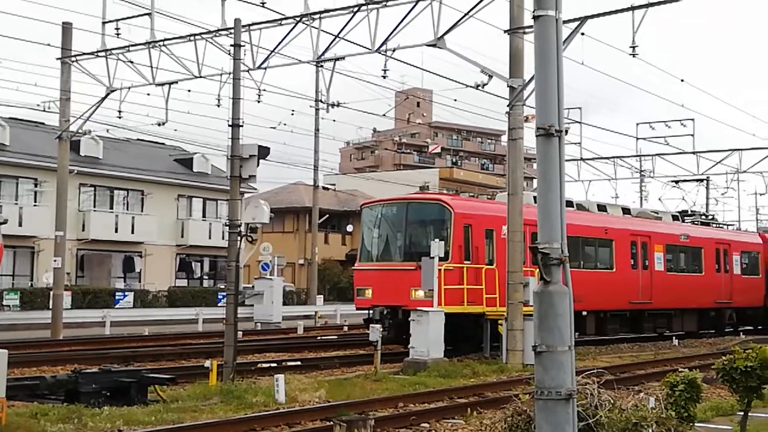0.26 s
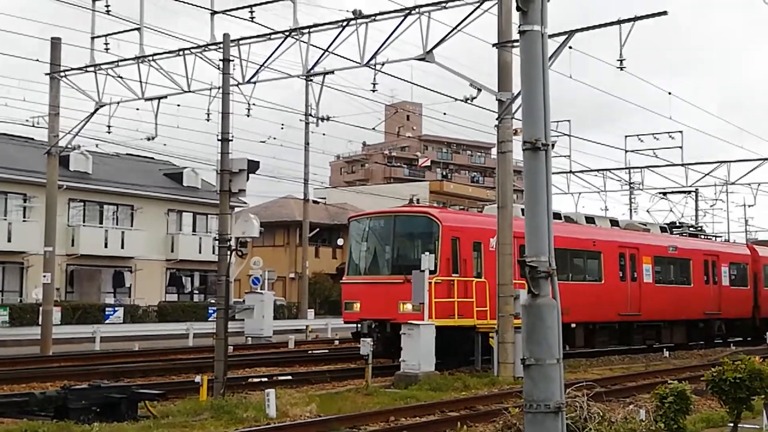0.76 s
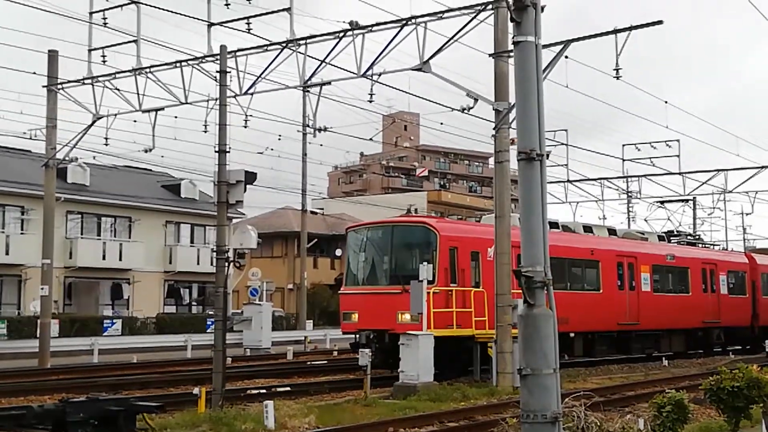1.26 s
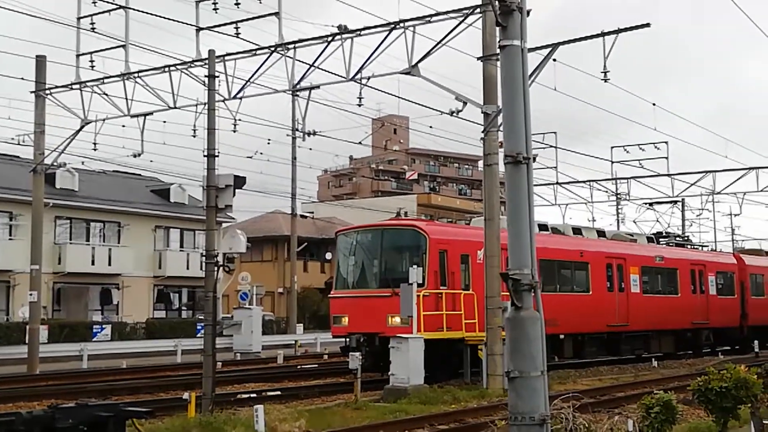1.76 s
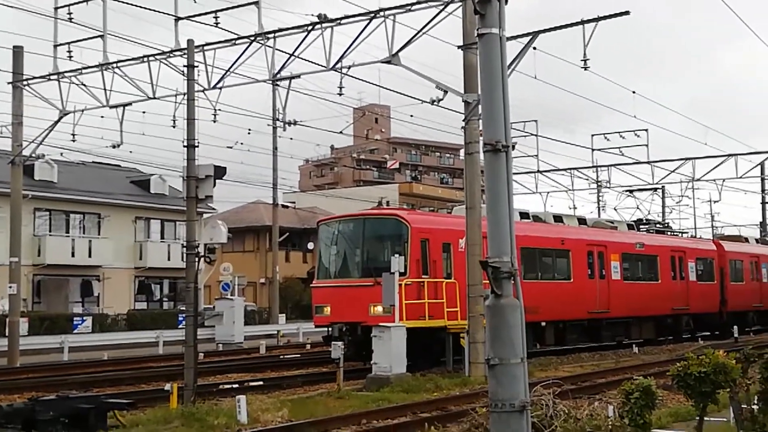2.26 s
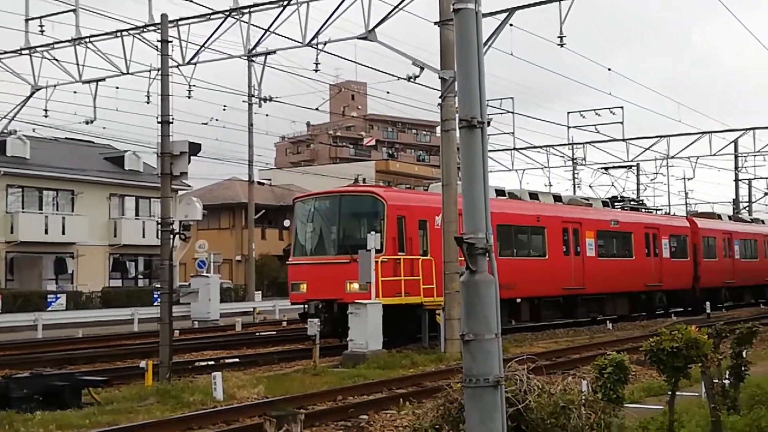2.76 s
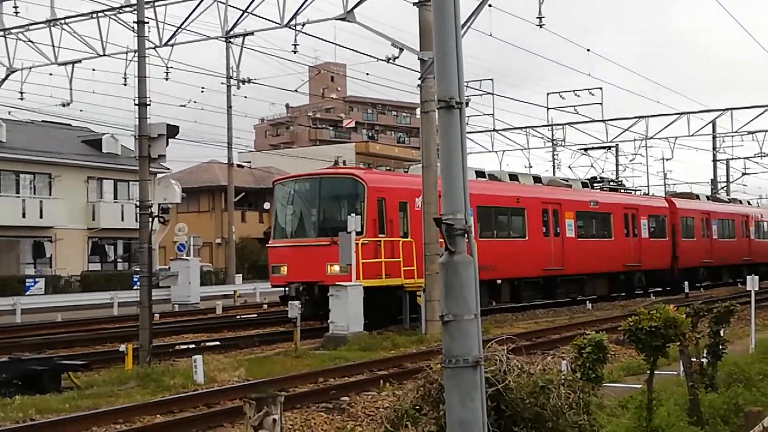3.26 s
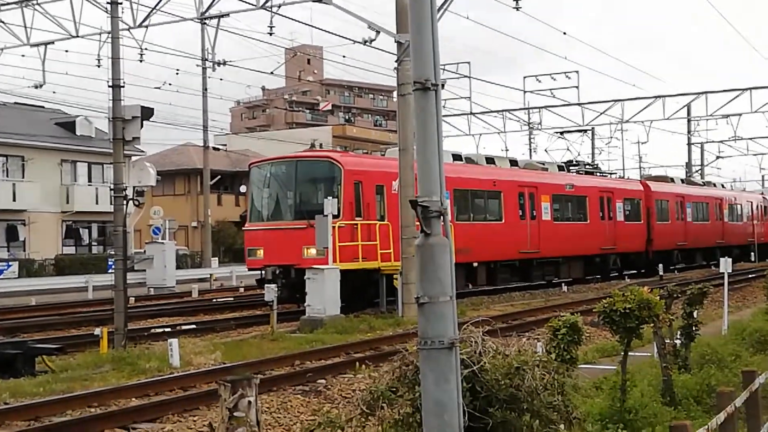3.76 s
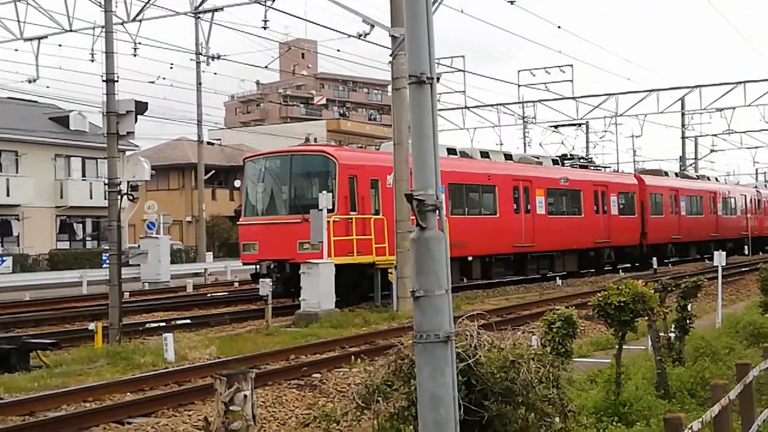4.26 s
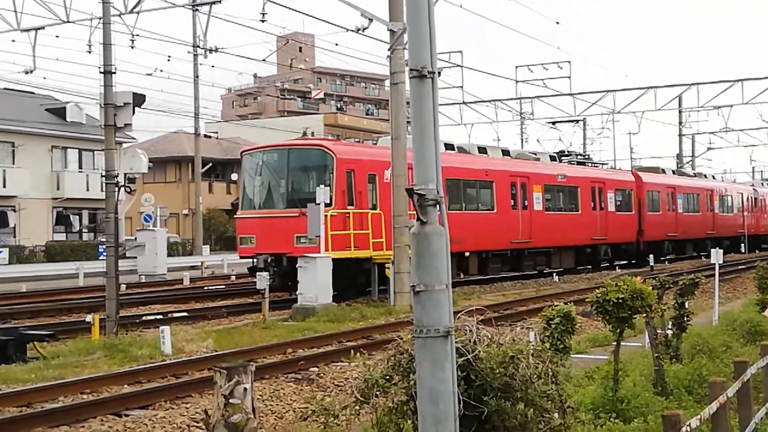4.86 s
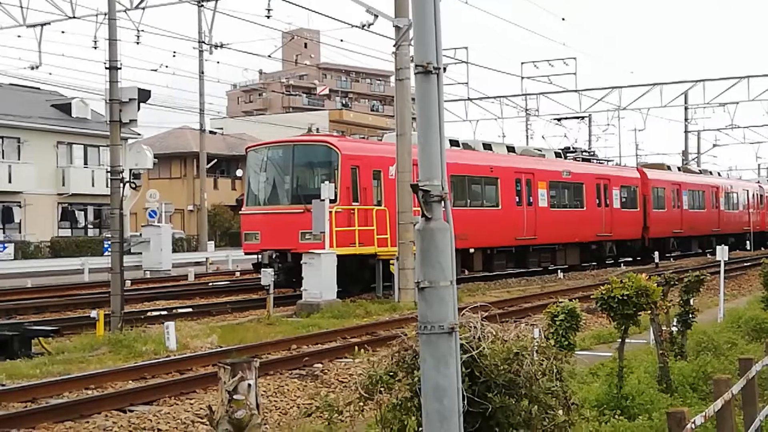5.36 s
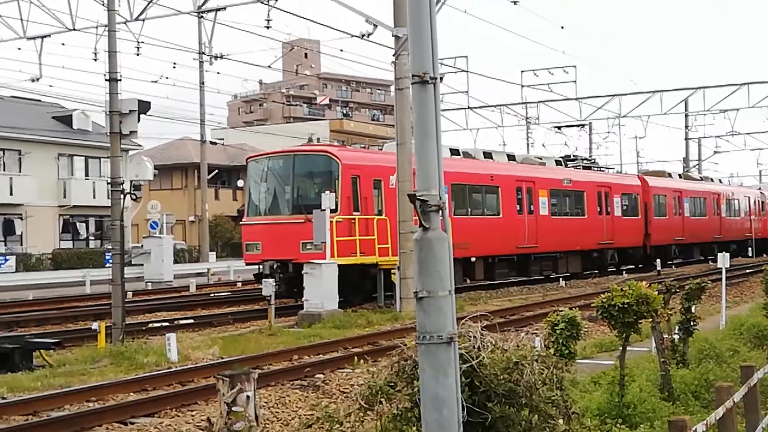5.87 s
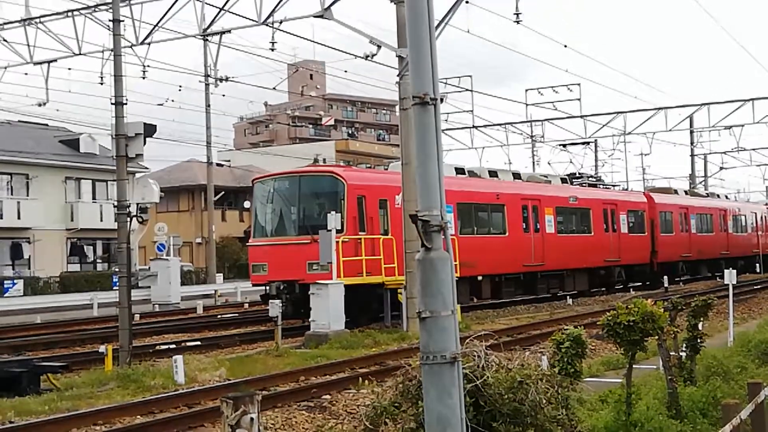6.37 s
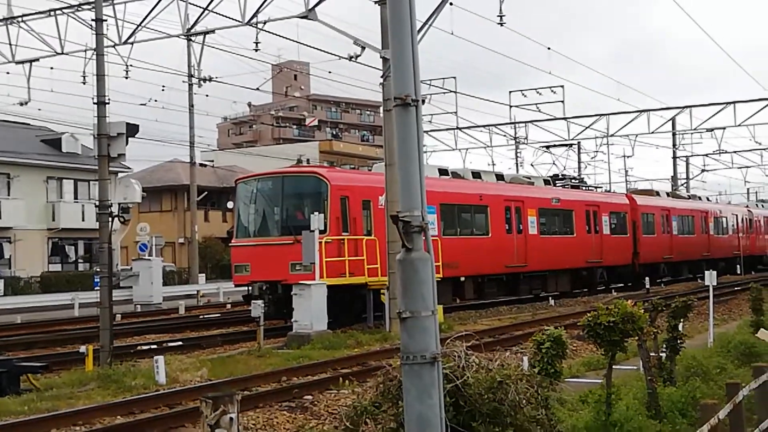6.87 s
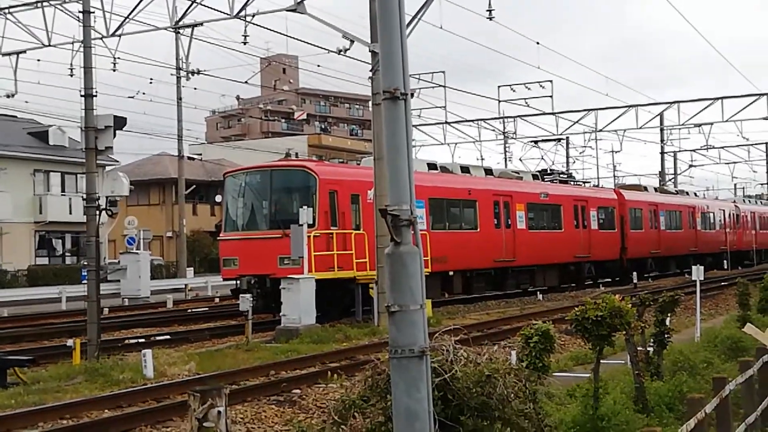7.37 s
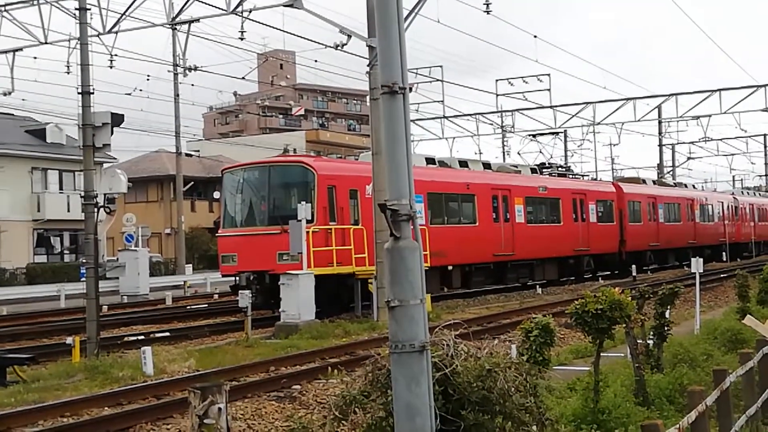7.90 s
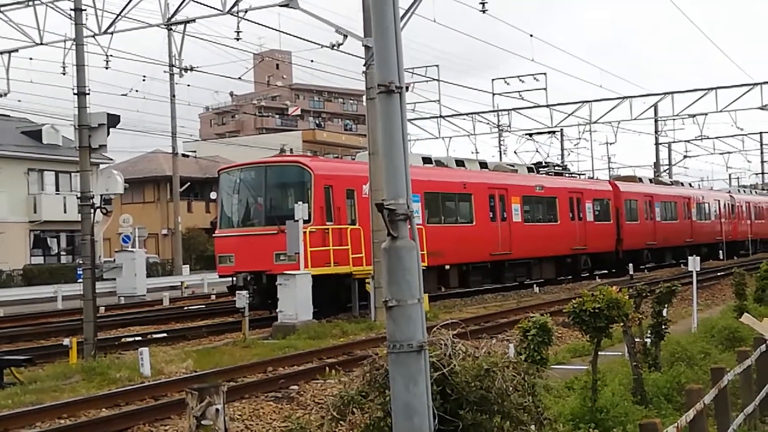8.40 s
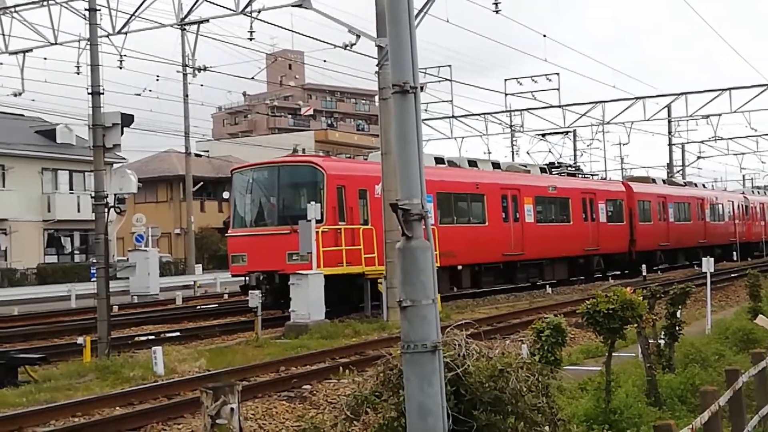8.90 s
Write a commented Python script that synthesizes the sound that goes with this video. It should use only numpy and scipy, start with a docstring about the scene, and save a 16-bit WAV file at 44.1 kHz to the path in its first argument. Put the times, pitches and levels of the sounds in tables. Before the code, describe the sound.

An electric train stops across the tracks, heard from a distance through gusty microphone buffeting. Faint high squeals and a sinking brake shudder come first, followed by one big release of compressed air, abrupt at first and then trailing away. What remains is steady fan wash, a faint electrical hum, fast regular compressor puffs and soft low wind, with a few tiny air spits.

```python
"""Gusts of wind buffet a small two-port microphone while, across the tracks, a stopping electric train's
brake squeals and judders; then its brake air blows off in one long hiss. Under the floor an air
compressor chuffs on among humming fans. Wind, air and fans are noise with random short-time spectra,
partly shared by the two ports; squeal, hum and crank rings are sines; eddies are short wave packets."""
import sys
import numpy as np
from scipy import signal
from scipy.io import wavfile
from scipy.ndimage import uniform_filter1d

SR = 44100
rng = np.random.default_rng(int(sys.argv[2]) if len(sys.argv) > 2 else 0)


def transcribe(u):
    """Save the signal u as a 16-bit wav file named by the first command-line argument.

    u: samples, shape (n,) or (channels, n), limited to [-1, 1]; the rate is SR.
    q: integer samples, one column per channel.
    """
    v = np.clip(np.atleast_2d(u).T, -1, 1)
    q = np.round(v * 32767).astype(np.int16)
    wavfile.write(sys.argv[1], SR, q)


def invert_db(x):
    """Field ratio 10**(x/20) for x, a level in decibels (scalar or array-like)."""
    u = np.asarray(x, float) / 20
    return 10 ** u


N = 403192
T = np.arange(N) / SR


def curve(points, x):
    """Joins the points of a curve with straight lines."""
    at, value = np.transpose(points)
    return np.interp(x, at, value)


def spectrum(points, hz):
    """Joins spectrum points on a log frequency axis."""
    f, value = np.transpose(points)
    return np.interp(np.log(hz + 1), np.log(f + 1), value)


def evened(x):
    """Scales to rms 1."""
    return x / np.sqrt(np.mean(abs(x) ** 2) + 1e-20)


def wander(cutoff_hz):
    """Slow random drift of rms 1: low-passed noise."""
    lowpass = signal.butter(2, cutoff_hz, fs=SR, output="sos")
    return evened(signal.sosfilt(lowpass, rng.standard_normal(N)))


def bumps(modes, hz):
    """Resonance peaks in dB over a flat line."""
    return sum(db / (1 + (2 * (hz - f) / width) ** 2) for f, width, db in modes)


def lean(left_right_db):
    """Gains of the left and right port that split a level difference evenly."""
    return invert_db(np.array([left_right_db, -left_right_db]).reshape(2, -1) / 2)


def swells(rows, rest, t):
    """Bell-shaped swells over a resting level: the summed level and the power-weighted last column."""
    middle, length, db, value = np.transpose(rows)[:, :, None]
    rest_db, rest_value = rest
    grid = np.arange(0, 3, .001)
    power = invert_db(2 * db) * np.exp(-(2.42 * (grid - middle) / length) ** 4)
    total = power.sum(0) + invert_db(2 * rest_db)
    mean = ((power * value).sum(0) + invert_db(2 * rest_db) * rest_value) / total
    return np.interp(t, grid, 10 * np.log10(total)), np.interp(t, grid, mean)


# how the two ports differ in level: (frequency [Hz], left over right [dB])
PORT_BALANCE = [(100, 0), (250, 0), (480, -2.5), (700, -4.5), (1250, -2.5), (1800, -3), (2800, -7.5),
                (3800, -4), (4800, -2.5), (5900, -3), (6900, -5.5), (7800, 9.5), (9000, 0.5), (10300, 6.5),
                (11800, -6.5), (13500, -2.5), (15000, -1)]


def noise(field_db, likeness, lead, size, patchy_db):
    """Random short-time spectra under field_db(hz, s), partly shared by the two ports."""
    frames = 4 * N // size + 5
    hz = np.fft.rfftfreq(size, 1 / SR)[:, None]
    t = np.arange(frames) * size / 4 / SR
    a, b, c, d, patches = rng.standard_normal((frames, len(hz), 5)).T
    # patches: random level blotches, smoothed over frequency and time
    patches = uniform_filter1d(patches, size=size // 100 + 1, axis=0)
    patches = evened(uniform_filter1d(patches, size=10, axis=1))
    like = np.clip(spectrum(likeness, hz), 0, 1)
    right = a + 1j * b
    shared = like * right * np.exp(1j * curve(lead, hz))
    left = shared + np.sqrt(1 - like ** 2) * (c + 1j * d)
    level = invert_db(field_db(hz, t) + patchy_db * patches)
    tilt = invert_db(spectrum(PORT_BALANCE, hz) / 2)
    ports = [left * level * tilt, right * level / tilt]
    return signal.istft(ports, nperseg=size, noverlap=3 * size // 4)[1][:, :N]


# phase between the ports for tones, fans, valves and murmur: (frequency [Hz], left leads by [rad])
PORT_LEAD = [(0, 0), (260, -0.62), (600, -3), (1290, -1.1), (2240, -2), (2840, -4), (4390, -1), (4740, -2),
             (5600, -5.5), (6200, -5), (8180, -4.5), (10700, -10.5), (13200, -10.9), (15200, -4)]


def tone_pair(hz):
    """A steady tone as the two ports pick it up, with their phase and level differences."""
    lead = np.array([[curve(PORT_LEAD, hz)], [0]])
    tone = np.sin(2 * np.pi * (hz * T + rng.random()) + lead)
    return tone * lean(spectrum(PORT_BALANCE, hz))


# fan wash, relative spectrum: (frequency [Hz], density [dB per Hz])
FAN_SPECTRUM = [(88, -48), (150, -12), (263, -5), (530, -12.5), (844, -11), (1200, -12.5), (1290, -13),
                (1540, -13.5), (3160, -17.5), (4390, -15), (5130, -20.5), (5760, -13.5), (7410, -29.5),
                (11600, -25.5), (15500, -54)]
# duct resonances: (frequency [Hz], width [Hz], peak [dB])
DUCTS = [(624, 48, 3), (833, 100, 4.5), (1303, 54, 5), (4670, 120, 2.5), (5500, 140, -0.5)]
# loudness of the wash: (time [s], level [dB])
FAN_LEVEL = [(0, -53.5), (.65, -53), (.93, -49.5), (1.3, -52.5), (3.3, -50.5), (5.6, -51.5), (9.14, -52.5)]
# left-right likeness of the fan and valve noise: (frequency [Hz], likeness [0..1])
FLOOR_LIKENESS = [(150, 1), (350, 0.97), (620, 0.48), (1000, 0.42), (2200, 0.22), (3200, 0.32),
                  (4500, 0.33), (7500, 0.077), (11000, 0.23)]
# converter hum: (multiple of the mains hum [-], level [dB rms])
HUMS = [(2, -69.5), (3, -67), (5, -72), (6, -73), (24, -71)]
MAINS_HUM_HZ = 120


def fans():
    """A broad wash of noise through ducts, with the mains hum of the converter."""
    def field_db(hz, t):
        return spectrum(FAN_SPECTRUM, hz) + bumps(DUCTS, hz) + 0 * t
    wash = noise(field_db, FLOOR_LIKENESS, PORT_LEAD, size=2048, patchy_db=1.1)
    out = evened(wash) * invert_db(curve(FAN_LEVEL, T))
    for multiple, db in HUMS:
        out += invert_db(db + wander(2.5)) * np.sqrt(2) * tone_pair(multiple * MAINS_HUM_HZ)
    return out


CRANK_TURNS_PER_S = 8.127
# valve strokes in one crank turn: (place [share of turn], level [dB], fade [share of turn])
STROKES = [(.09, -6, .07), (.39, -2, .1), (.56, -5, .06), (.655, 0, .07), (.83, -4, .06), (.93, -5, .05)]
# valve hiss, relative spectrum: (frequency [Hz], density [dB per Hz])
VALVE_SPECTRUM = [(1500, -13), (3000, -14.5), (4400, -5.5), (5700, -1), (6600, -4), (7800, -11.5),
                  (9400, -9), (10800, -5), (12200, -11), (14500, -24.5)]
# loudness of the valve hiss: (time [s], level [dB])
CHUFF_LEVEL = [(0, -53), (.2, -55.5), (.7, -59), (1.3, -62), (3.3, -57.5), (4.3, -57.5), (4.8, -61.5),
               (5.8, -59), (9.14, -59.5)]
# rings struck once a turn: (place [share of turn], multiple of crank speed [-], width [Hz], level [dB])
CRANKCASE = [(0.673, 11, 2.1, -52), (0.33, 27, 4.5, -67.5), (0.3, 32, 2, -72), (0.37, 34, 4.1, -73.5),
             (0.327, 37, 12, -77), (0.316, 47, 7.4, -76), (0.33, 77, 5.1, -72.5), (0.18, 104, 9.8, -73.5),
             (0.09, 161.5, 6.2, -73.5), (0.18, 158.5, 28, -76)]


def compressor():
    """Each valve stroke lets out a fading puff; intake pipe and casing ring once a turn."""
    turn = T * CRANK_TURNS_PER_S
    power = 0.031  # hiss between the strokes
    for share, db, fade in STROKES:
        power = power + invert_db(2 * db) * np.exp(-((turn - share) % 1) / fade)
    puffs = evened(np.sqrt(uniform_filter1d(power, size=120))) * invert_db(wander(22))

    def field_db(hz, t):
        return spectrum(VALVE_SPECTRUM, hz) + 0 * t
    hiss = evened(noise(field_db, FLOOR_LIKENESS, PORT_LEAD, size=512, patchy_db=1))
    out = hiss * puffs * invert_db(curve(CHUFF_LEVEL, T))
    for share, multiple, width, db in CRANKCASE:
        since_s = ((turn - share) % 1) / CRANK_TURNS_PER_S
        ring = evened(uniform_filter1d(np.exp(-np.pi * width * since_s), size=300))
        out += ring * np.sqrt(2) * invert_db(db + wander(1.9)) * tone_pair(multiple * CRANK_TURNS_PER_S)
    return out


# gusts: (middle [s], length [s], level [dB], sharpness added to the upper rumble [dB])
GUSTS = [(.04, 0.055, -28, -4.5), (.13, 0.083, -26, -2.5), (.25, .11, -23, 0), (.33, 0.044, -27, 9),
         (.48, 0.17, -26, 0.5), (.65, 0.19, -29, -5.5), (.81, .08, -26, 11.5), (.9, 0.054, -25, 4.5),
         (1.1, 0.053, -20.5, -15), (1.18, 0.12, -24, -1.5), (1.31, 0.13, -25.5, -4.5),
         (1.45, 0.11, -23, -8), (1.65, 0.2, -33.5, -2), (1.99, .12, -25, 0), (2.1, 0.039, -34, 11),
         (2.27, 0.087, -33, -3.5), (2.41, 0.064, -30.5, -8.5)]
LULL_DB, LULL_SHARP_DB, CALM_S = -39, -2.5, 2.55  # between gusts; the gusty rumble has faded out by CALM_S
# gust rumble, relative spectrum: (frequency [Hz], density [dB per Hz])
WIND_SPECTRUM = [(12, -42), (20, -4), (43, 0), (102, 1.5), (229, -10), (335, -21), (541, -35), (755, -49),
                 (900, -50), (1170, -71.5), (1980, -120)]
# left-right likeness of the wind: (frequency [Hz], likeness [0..1])
WIND_LIKENESS = [(40, .985), (90, .93), (160, .78), (300, .88), (600, .8)]
# phase between the ports for the wind: (frequency [Hz], left leads by [rad])
WIND_LEAD = [(0, 0), (60, -.15), (110, -.45), (180, -1.0), (320, -1.9), (600, -2.9), (1000, -3)]
# sharp eddies: (crest [s], peak [dB], pitch [Hz], left over right [dB])
POPS = [(0.1148, -18, 205, -2), (0.2298, -20, 357, -5.5), (0.2586, -17.5, 200, -6), (0.3323, -22, 196, -10),
        (0.4528, -19, 204, -4), (0.4873, -15.5, 246, -3), (0.632, -19, 168, -1), (0.7901, -18, 230, -3),
        (0.815, -8, 340, -3.5), (0.823, -33, 244, 3), (0.909, -25, 265, -6), (1.058, -17.5, 208, 1),
        (1.1691, -16, 252, -3), (1.222, -25, 189, -4), (1.3039, -28, 255, 3), (1.421, -22.5, 253, -3),
        (1.4683, -23.5, 225, -5), (1.871, -22, 290, 1), (1.98, -20, 207, 0), (2.0918, -20.5, 200, -4.5),
        (2.276, -22, 143, 1), (2.4053, -30, 115, -3), (5.3838, -29, 173, -2), (5.804, -31.5, 134, 0),
        (6.629, -28, 109, -1)]
# murmur, relative spectrum: (frequency [Hz], density [dB per Hz])
MURMUR_SPECTRUM = [(12, -49), (20, -3.5), (38, 1), (92, -2.5), (113, -10), (142, -7), (210, -20),
                   (270, -51), (460, -120)]
# loudness of the low murmur: (time [s], level [dB])
BREEZE = [(0, -38), (2.6, -46.5), (3.3, -45), (3.7, -46), (4.1, -40.5), (4.4, -46), (4.8, -42),
          (5.1, -49.5), (5.6, -46), (6.2, -49), (6.6, -43.5), (7, -48.5), (7.6, -47.5), (8.6, -50),
          (8.95, -44.5), (9.14, -46)]


def wind():
    """Lumpy rumble that sharpens in gusts, single eddies popping on the ports, and a smooth murmur."""
    def rumble_db(hz, t):
        sharp_db = swells(GUSTS, (LULL_DB, LULL_SHARP_DB), t)[1]
        return spectrum(WIND_SPECTRUM, hz) + sharp_db * np.clip(np.log2(hz / 110 + 1e-9), 0, 1)
    rumble = noise(rumble_db, WIND_LIKENESS, WIND_LEAD, size=1024, patchy_db=3.5)
    # flatten the level of the lows, then lay the gusts on top
    low = signal.sosfiltfilt(signal.butter(4, 160, fs=SR, output="sos"), rumble.mean(0))
    steady = rumble / np.sqrt(abs(uniform_filter1d(low ** 2, size=3000)) + 1e-12)
    gust_db = swells(GUSTS, (LULL_DB, 0), T)[0] + wander(12.5)
    out = steady * invert_db(gust_db) * np.clip((CALM_S - T) / 0.074, 0, 1)

    for s, db, hz, pan_db in POPS:
        late_s = -curve(WIND_LEAD, hz) / (2 * np.pi * hz)  # the eddy reaches the left port later
        cycles = (np.arange(-1000, 1000) / SR - np.array([[late_s], [0]])) * hz
        pop = np.exp(-(cycles / .52) ** 2) * np.cos(2 * np.pi * cycles)
        out[:, round(s * SR) - 1000:][:, :2000] += pop * invert_db(db) * lean(pan_db)

    def murmur_db(hz, t):
        return spectrum(MURMUR_SPECTRUM, hz) + 0 * t
    murmur = noise(murmur_db, WIND_LIKENESS, PORT_LEAD, size=2048, patchy_db=-0.05)
    return out + evened(murmur) * invert_db(curve(BREEZE, T))


# one faint late squeak: (start [s], length [s], pitch [Hz], level [dB], width [Hz])
CREAK = (4.49, .2, 3120, -63.5, 200)


def creak():
    """A short breathy whistle: narrow-band noise under a half-sine swell."""
    s, length, hz, db, width = CREAK
    swell = np.sin(np.pi * np.clip((T - s) / length, 0, 1))
    band = signal.butter(2, [hz - width / 2, hz + width / 2], "bandpass", fs=SR, output="sos")
    whistle = evened(signal.sosfilt(band, rng.standard_normal(N)))
    return swell * invert_db(db) * whistle * lean(-6.)


# small valves spit short bright puffs of air:
# (start [s], level [dB], length before 100 extra samples [s], left over right [dB], centre [Hz])
SPITS = [(0.769, -44, 0.021, 3, 10100), (0.784, -54.5, 0.11, 3, 10500), (.58, -63, 0.22, 2, 9500),
         (0.837, -48.5, .01, 4, 10000), (0.925, -57, 0.09, -2, 11000), (1.062, -58, .01, -6, 11000),
         (3.101, -51, 0.083, -2, 11100), (3.719, -53, .005, 2, 10500)]


def spits():
    """Short bright puffs of air, each through its own small nozzle (a band of noise)."""
    out = np.zeros((2, N))
    for s, db, length, pan_db, hz in SPITS:
        shape = signal.windows.tukey(round(length * SR) + 100, .6)
        shared, left, right = rng.standard_normal((3, len(shape)))
        nozzle = signal.butter(2, [hz * 0.88, hz * 1.1], "bandpass", fs=SR, output="sos")
        # the shared part is in opposite phase at the two ports
        air = evened(signal.sosfilt(nozzle, [left + 0.44 * shared, right - 0.41 * shared]))
        out[:, round(s * SR):][:, :len(shape)] += air * shape * invert_db(db) * lean(pan_db)
    return out


# bursts of squeal: (middle [s], length [s], level [dB], left over right [dB])
SQUEAL = [(.01, 0.067, -52, -8), (.075, .06, -44.5, 4), (.128, 0.055, -48, -10.5), (.235, 0.1, -47, -15),
          (.31, 0.058, -46, -11), (.395, 0.085, -39.5, -11), (.47, 0.046, -44.5, 9.5),
          (.515, 0.045, -43, -6), (.595, 0.093, -45.5, -10), (.668, 0.038, -44.5, 5), (.735, .05, -53, 2)]
SQUEAL_START_HZ, SQUEAL_RISE_HZ_PER_S = 3882, 150
SQUEAL_REST_DB = -63  # between bursts
# modes of the wheel: (frequency [Hz], width [Hz], peak [dB])
WHEEL = [(920, 45, 15), (1490, 55, 21), (2500, 150, 5), (2890, 60, 15), (3220, 80, 5), (3100, 550, 7)]
GRIP_S, GRIP_RISE_S, LET_GO_S, LET_GO_FALL_S = 0.58, 0.17, 1.03, 0.18  # the block grips, slips ever slower
GRIP_DB, GRIP_SAG_DB_PER_S, GRIP_HZ, SINK_OCTAVES_PER_S = -44.5, 4, 4330, 2.7


def brake_block():
    """A thin wavering squeal, then slips that shake the wheel's modes from high to low."""
    db, pan_db = swells(SQUEAL, (SQUEAL_REST_DB, -4), T)
    turns = np.cumsum(SQUEAL_START_HZ + SQUEAL_RISE_HZ_PER_S * T + 4 * wander(30)) / SR
    ending = np.clip((SQUEAL[-1][0] - T) / .04 + 1, 0, 1)  # fades out from the middle of the last burst
    level = np.sqrt(2) * invert_db(db + 1.7 * wander(37)) * ending
    squeal = level * np.sin(2 * np.pi * turns + np.array([[2.6], [0]])) * lean(pan_db)

    def field_db(hz, t):
        centre_hz = GRIP_HZ * 2 ** (-SINK_OCTAVES_PER_S * np.clip(t - GRIP_S, 0, .7))
        return bumps(WHEEL, hz) - 11 * np.log2((hz + 1) / centre_hz) ** 2
    likeness = [(900, 0.29), (2800, .7), (5000, 0.31)]  # (frequency [Hz], likeness [0..1])
    lead = [(0, 0), (600, -2.0), (5000, -3.0)]  # (frequency [Hz], left leads by [rad])
    shake = noise(field_db, likeness, lead, size=2048, patchy_db=1.5)
    shake /= np.sqrt(uniform_filter1d((shake ** 2).mean(0), size=8000))
    grip = np.clip((T - GRIP_S) / GRIP_RISE_S + .3, 0, 1)
    grip *= np.clip(1 - (T - LET_GO_S) / LET_GO_FALL_S, 0, 1) ** 2
    grip_db = GRIP_DB - GRIP_SAG_DB_PER_S * (T - GRIP_S) + 1.5 * wander(25)
    return squeal + shake * grip * invert_db(grip_db)


VALVE_OPEN_S, OPENING_S, CRACK_DB, FILL_S = 1.693, 0.03, -2.5, 0.011  # fully open, then fills to full flow
FULL_DB, VALVE_HOLDS_S, KNEE_S, FALL_DB_PER_S = -21.5, 1.985, 0.049, 35  # a rounded knee into the fall


def flow_db(t):
    """Flow of brake air: a quick opening, a hold, an even fall in dB."""
    opening = np.clip(1 + (t - VALVE_OPEN_S) / OPENING_S, 1e-3, 1)
    filling_db = CRACK_DB * np.exp(-np.maximum(t - VALVE_OPEN_S, 0) / FILL_S)
    fall_s = KNEE_S * np.logaddexp(0, (t - VALVE_HOLDS_S) / KNEE_S)
    return FULL_DB + 20 * np.log10(opening ** 2) + filling_db - FALL_DB_PER_S * fall_s


# the jet at full pressure, relative spectrum: (frequency [Hz], density [dB per Hz])
JET_SPECTRUM = [(300, -26), (480, -9), (650, -17), (850, -8.5), (1250, -9.5), (1800, -4), (2800, -2.5),
                (3800, 3), (4800, -1.5), (5900, -3.5), (6900, -5), (7800, -2.5), (9000, 7.5), (10300, 10),
                (11800, 3.5), (13500, 0), (14600, -16), (15500, -36)]
# the jet as it dies away, relative spectrum: (frequency [Hz], density [dB per Hz])
SPENT_SPECTRUM = [(480, -23), (850, -8.5), (1250, -2.5), (1800, -1), (3800, 1), (4800, -2), (5900, -2),
                  (6900, -3), (7800, -8), (9000, -4.5), (10300, 0), (11800, -4.5), (13500, -19.5),
                  (15500, -52)]
# left-right likeness of the jet: (frequency [Hz], likeness [0..1])
JET_LIKENESS = [(600, 0.7), (1500, 0.48), (3000, 0.13), (5200, 0.81), (7500, 0.11), (10000, 0.27),
                (14000, 0.35)]
# phase between the ports for the jet: (frequency [Hz], left leads by [rad])
JET_LEAD = [(0, -2), (520, -2), (1300, -.5), (2500, -1), (3600, -5.5), (5400, -4.5), (7500, -7.5),
            (9500, -6.5), (11000, -8), (15000, -8.5)]
# treble tilt [dB per octave], brightest as the valve opens
TILT_DB, BURST_TILT_DB, BURST_S = -0.48, 2.5, 0.27
DULL_AFTER_DB, DULL_PER_DB = 12.5, 0.16  # the tilt sinks once the flow has dropped this far


def brake_air():
    """A turbulent jet of noise that dulls as the pressure sinks."""
    def field_db(hz, t):
        drop_db = FULL_DB - flow_db(np.maximum(t, VALVE_OPEN_S + 0.09))
        burst_tilt = BURST_TILT_DB * np.exp(-abs(t - VALVE_OPEN_S) / BURST_S)
        tilt = TILT_DB + burst_tilt - DULL_PER_DB * np.clip(drop_db - DULL_AFTER_DB, 0, 22)
        spent = np.clip((drop_db + 7.0) / 14, 0, 1)  # weak flow leaves mostly the echo off the houses
        full = spectrum(JET_SPECTRUM, hz)
        change_db = np.clip(spectrum(SPENT_SPECTRUM, hz) - full, -20, 10)
        return full + spent * change_db + tilt * np.log2(hz / 4000 + 0.14)
    jet = noise(field_db, JET_LIKENESS, JET_LEAD, size=512, patchy_db=0.9)
    steady = jet / np.sqrt(abs(uniform_filter1d(jet.mean(0) ** 2, size=6000)))
    return steady * invert_db(flow_db(T) + 0.35 * wander(14)) * (T > VALVE_OPEN_S - OPENING_S)


def scene():
    """All sources at the microphone."""
    return fans() + compressor() + wind() + creak() + spits() + brake_block() + brake_air()


def roll_off(x):
    """The treble ends steeply here."""
    return signal.sosfilt(signal.butter(12, 15710, fs=SR, output="sos"), x)


def record(dry):
    """Turns the finished mix into the final output."""
    return roll_off(dry)


dry = scene()
out = record(dry)
transcribe(out)
```